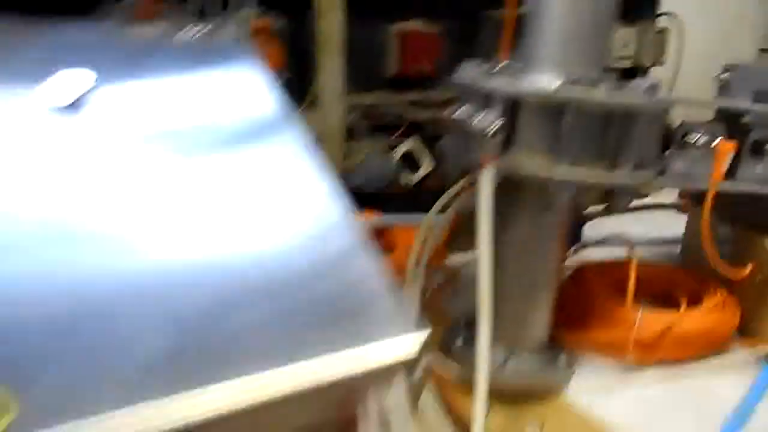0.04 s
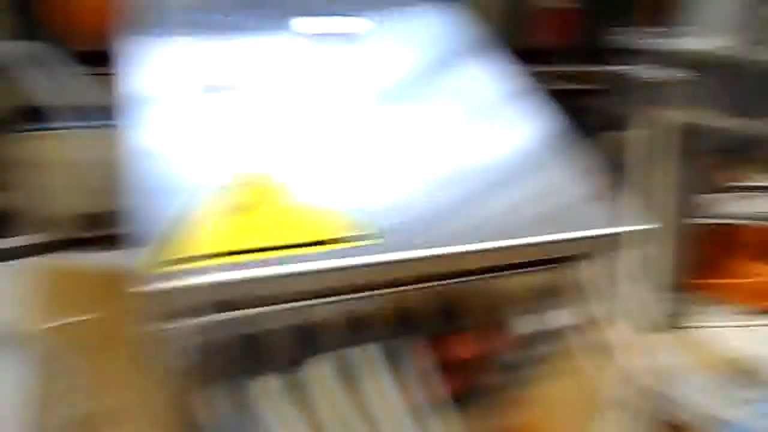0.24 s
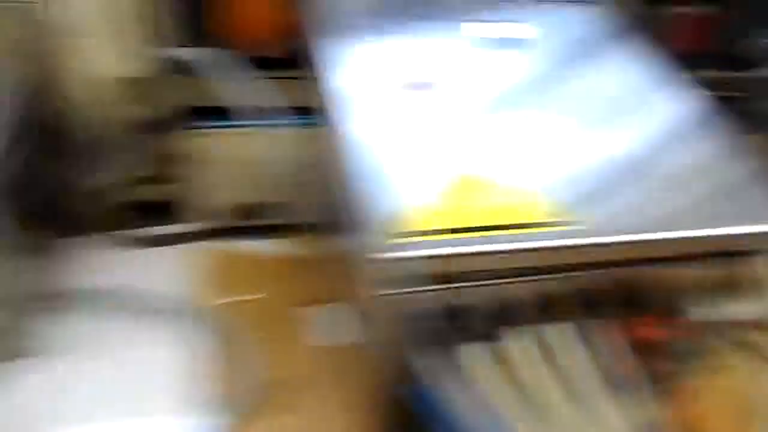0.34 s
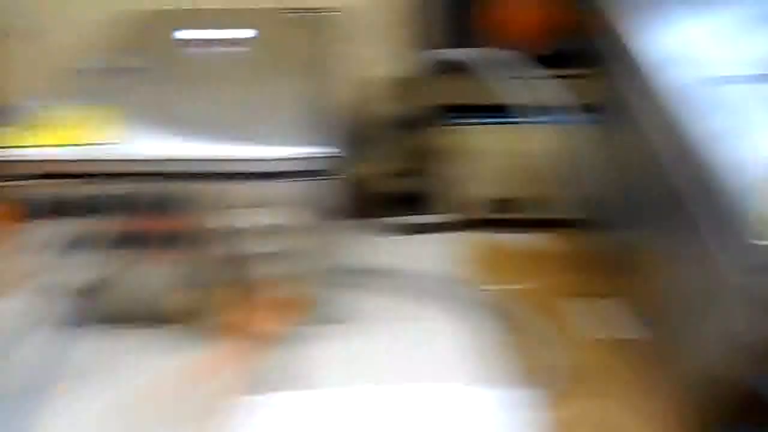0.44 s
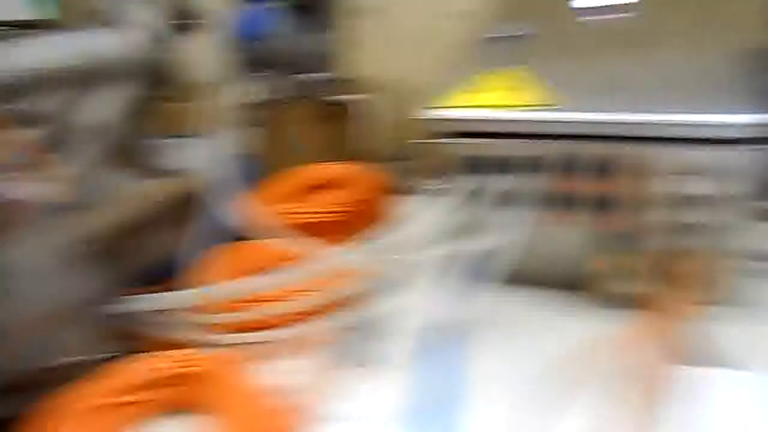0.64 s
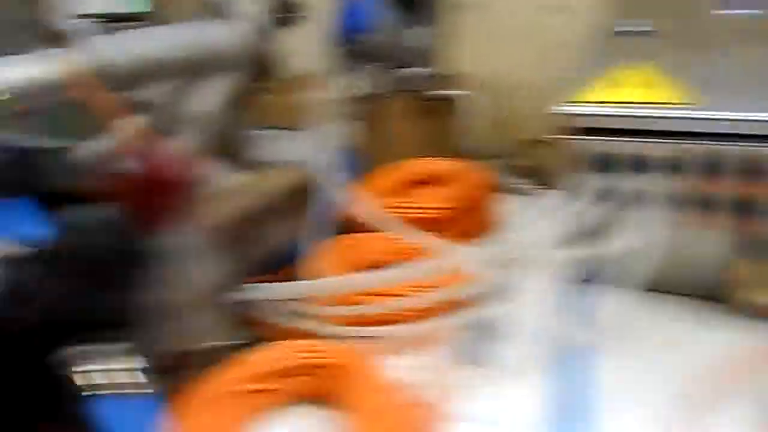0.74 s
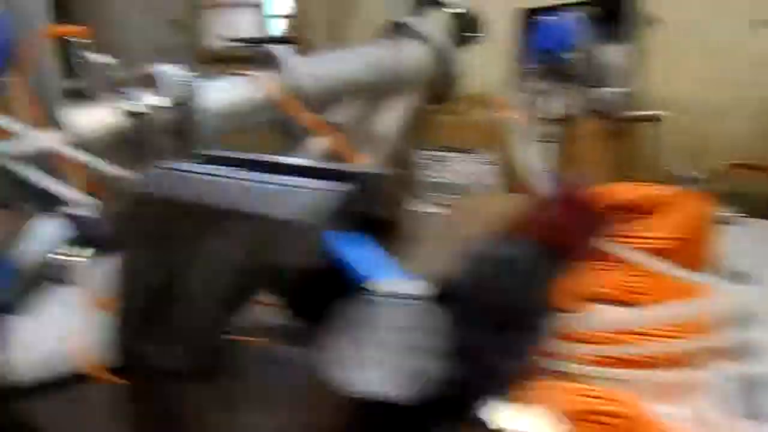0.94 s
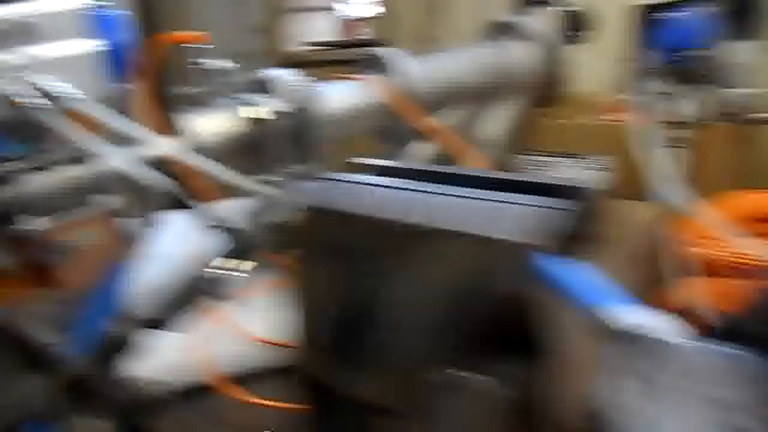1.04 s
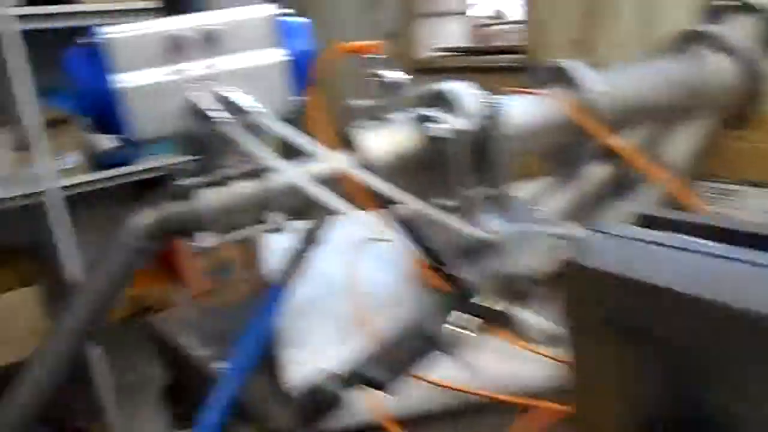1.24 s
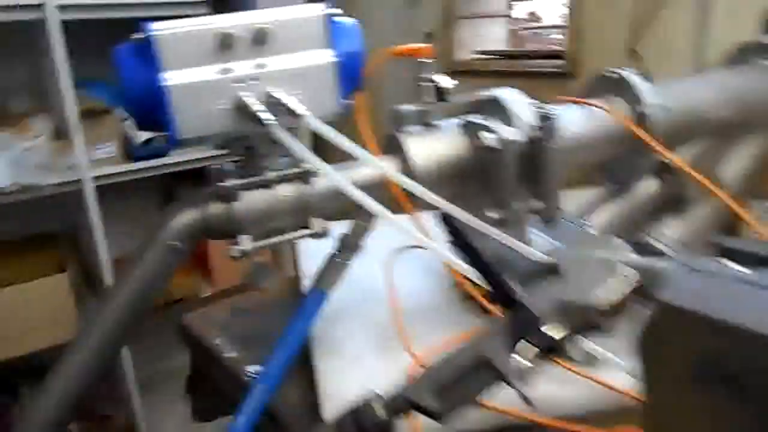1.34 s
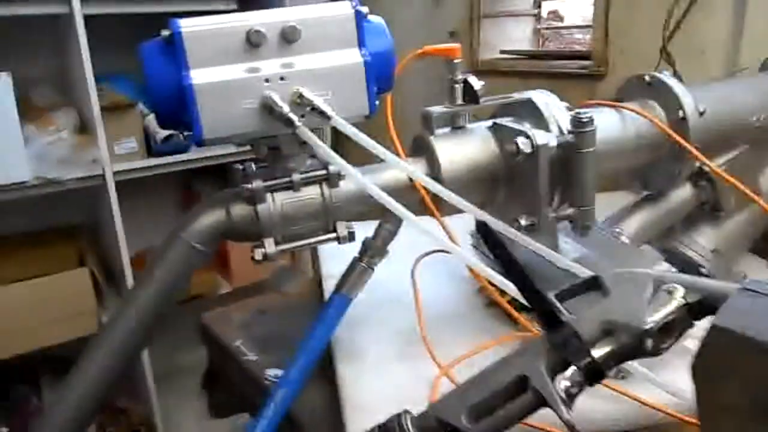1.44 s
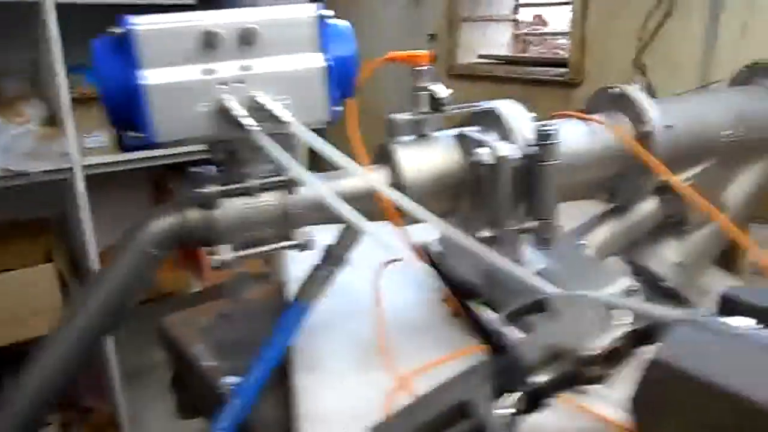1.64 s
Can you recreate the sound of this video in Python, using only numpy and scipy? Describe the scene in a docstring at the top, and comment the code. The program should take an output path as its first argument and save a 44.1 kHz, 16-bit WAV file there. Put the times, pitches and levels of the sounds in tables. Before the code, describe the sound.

Pneumatic valves vent compressed air twice in a lightly echoing workshop. After faint room noise, clicks at 0.2 s lead to a sharp blast at 0.23 s, settling into hiss that closes near 0.51 s with a dull knock. A grainy rustle follows at 0.62-0.76 s. Clicks at 1.1 s start a second blast, with airy whistles, ending with a click near 1.42 s and a short fading tail over a faint leak.

```python
"""Two pneumatic valve vents in a workshop

In a workshop a solenoid ticks, trapped air bursts out as coloured noise with a low thump,
and the cylinder exhausts in a steadier hiss until the stroke ends; then all this happens once more.
Hoses sing as narrow noise, valve bodies ring as decaying sines, and a grainy rustle falls between.
Room noise, a faint leak and handling rumble lie underneath."""
import sys
import numpy as np
from scipy import signal
from scipy.fft import rfft, irfft
from scipy.io import wavfile
from scipy.ndimage import uniform_filter1d

SR = 44100
rng = np.random.default_rng(int(sys.argv[2]) if len(sys.argv) > 2 else 0)


def wav_record(signal):
    """Record a signal, one row per channel, as 16-bit PCM in the file named by sys.argv[1]."""
    frames = np.transpose(np.atleast_2d(signal))
    bounded = np.clip(frames, -1, 1)
    # unit amplitude maps onto the largest positive 16-bit level
    quanta = np.round(bounded * 32767).astype(np.int16)
    wavfile.write(sys.argv[1], SR, quanta)


def ratio_of_db(decibels):
    """Turn decibels (scalar or array-like) into linear amplitude factors; 0 dB maps to 1."""
    return 10 ** (np.asarray(decibels, float) / 20)


N = 74970  # samples, 1.7 s


def curve(rows):
    """Gain over time, drawn straight in dB between (t/s, level/dB) rows."""
    return ratio_of_db(np.interp(np.arange(N) / SR, *np.array(rows).T))


def colour(x, points, peaks=()):
    """Filters by (f/Hz, level/dB) points plus resonant (f/Hz, width/Hz, lift/dB) peaks; rms 1."""
    hz = np.arange(N // 2 + 1) * SR / N + 1  # the 1 keeps the logarithm finite
    f, db = np.array(points).T
    gain_db = np.interp(np.log(hz), np.log(f), db)
    for f0, width, lift_db in peaks:
        gain_db = gain_db + lift_db / (1 + (2 * (hz - f0) / width) ** 2)
    y = irfft(rfft(x) * ratio_of_db(gain_db), N)
    return y / np.std(y)


def walk(rate):
    """Random drift around 0: normal draws held for 1 / rate s and smoothed twice."""
    k = int(SR / rate)
    held = np.repeat(rng.standard_normal(N // k + 1), k)
    return 0.74 * uniform_filter1d(uniform_filter1d(held, k), k)[:N]


def air(points, peaks=()):
    """Turbulent air: coloured noise whose level flickers slightly."""
    hiss = colour(rng.standard_normal(N), points, peaks)
    flicker_db = 1 * walk(70)
    return hiss * ratio_of_db(flicker_db)


def shape(start, rise, until, t60):
    """Envelope: linear rise, hold, then exponential fall (all in s)."""
    t = np.arange(N) / SR
    attack = np.clip((t - start) / rise, 0, 1)
    return attack * ratio_of_db(-60 * np.clip(t - until, 0, None) / t60)


def band(hz, width):
    """Narrow noise: two slow noises carried by a sine and cosine whose pitch may move; rms 1."""
    slow = signal.lfilter(*signal.butter(2, width / 2, fs=SR), rng.standard_normal((2, N)))
    phase = 2 * np.pi * np.cumsum(hz + np.zeros(N)) / SR
    return (slow[0] * np.cos(phase) + slow[1] * np.sin(phase)) / np.std(slow)


def room_noise():
    """Broadband noise of the workshop, its level rising and falling by a few dB."""
    # room noise level: (t/s, level/dB)
    room_levels = [(0, -47.5), (.06, -50.5), (.18, -55.5), (.6, -53.5), (.8, -50), (1.0, -53), (1.1, -48),
                   (1.6, -52.5), (1.7, -53)]
    # room noise spectrum: (f/Hz, density/dB)
    room_spectrum = [(20, -65), (100, -35.5), (180, -19.5), (283, -10.5), (541, -5), (819, -7.5),
                     (1100, -6.5), (1880, -7), (3500, -11.5), (5500, -16.5), (7640, -19.5), (9400, -28.5),
                     (20000, -27)]
    return curve(room_levels) * air(room_spectrum)


def leak():
    """Faint hiss of air through a small gap: turbulence with little bass."""
    # leak level: (t/s, level/dB)
    leak_levels = [(0, -64), (.06, -56.5), (.17, -68), (.75, -54), (.85, -61), (1.0, -54), (1.09, -50),
                   (1.55, -48), (1.62, -49), (1.7, -51)]
    # leak spectrum: (f/Hz, density/dB)
    leak_spectrum = [(800, -25.5), (2500, -2.5), (3300, -5.5), (4500, -4.5), (5800, -6.5), (6750, -2),
                     (7500, -9), (8500, -16), (9400, -21.5), (20000, -13.5)]
    return curve(leak_levels) * air(leak_spectrum)


def rumble():
    """Low rumble of handling: noise weighted towards the bass."""
    # rumble level: (t/s, level/dB)
    rumble_levels = [(0.0, -73), (0.132, -72), (0.268, -78), (0.538, -75), (0.676, -76), (0.88, -69),
                     (0.998, -78), (1.198, -92), (1.652, -84), (1.7, -84)]
    # rumble spectrum: (f/Hz, density/dB)
    rumble_spectrum = [(10, -18), (30, -4.5), (90, -10.5), (200, -19), (1000, -79)]
    return curve(rumble_levels) * air(rumble_spectrum)


def rustle():
    """Dense uneven grains of something brushed or dragged, with a moving hollow tone."""
    # rustle level: (t/s, level/dB)
    rustle_levels = [(.615, -53), (.635, -40.5), (.65, -41.5), (.668, -39), (.7, -41), (.73, -46),
                     (.76, -53.5), (.8, -62.5)]
    # grain spectrum: (f/Hz, density/dB)
    rustle_spectrum = [(60, -48), (154, -22), (450, -6), (900, -10), (1500, -6), (2500, -12), (6700, -21.5),
                       (9900, -39), (12900, -78)]
    # path of the hollow tone: (t/s, f/Hz)
    hollow_path = [(.63, 480), (.655, 850), (.67, 1000), (.695, 800), (.73, 1200)]
    grains_per_s, unevenness_db = 9000, 1.5
    grains = (rng.random(N) < grains_per_s / SR) * rng.standard_normal(N)
    grains = grains * ratio_of_db(unevenness_db * walk(150))
    hollow_hz = np.interp(np.arange(N) / SR, *np.array(hollow_path).T)
    hollow = ratio_of_db(-9) * band(hollow_hz, 500)  # 9 dB below the grains
    envelope = curve(rustle_levels) * shape(rustle_levels[0][0], 0.013, rustle_levels[-1][0], .2)
    return (colour(grains, rustle_spectrum) + hollow) * envelope


def knocks():
    """Dull knocks as each stroke ends: short thuds of narrow low noise."""
    # knocks: (t/s, level/dB, f/Hz, t60/s)
    knock_rows = [(0.514, -52, 230, .4), (1.445, -61, 250, 0.38)]
    out = 0
    for s, db, hz, t60 in knock_rows:
        out = out + ratio_of_db(db) * shape(s, .01, s + 0.0057, t60) * band(hz, hz / 2)
    return out


def solenoids():
    """Solenoid and spool ticks: each rings the valve body modes nearest its centre as decaying sines."""
    # ticks: (t/s, level/dB, centre of the modes struck f/Hz, spread/octaves)
    tick_rows = [(.1990, -33.5, 600, 0.92), (.2010, -37, 4100, 0.18), (.2075, -38, 4100, .2),
                 (.2040, -37, 1490, .2), (0.2117, -27, 7850, .2), (1.1012, -40.5, 6800, .2),
                 (1.1058, -29.5, 1100, 0.84), (1.1165, -13.5, 2900, .4), (1.418, -24, 3200, 0.43)]
    # valve body modes: (f/Hz, level/dB, t60/s)
    body_modes = [(380, 0, 0.012), (694, -1.5, 0.016), (1000, 3.5, 0.012), (1450, 1, 0.035),
                  (2900, -5.5, 0.012), (3600, -6, 0.011), (4100, -9, 0.023), (5130, -6.5, 0.013),
                  (6800, -10, .012), (7500, -3, 0.019), (8000, 5, 0.015), (9100, -7, .01)]
    rise_s = .0008
    out, t = np.zeros(N), np.arange(N) / SR
    all_phases = rng.random((len(tick_rows), len(body_modes)))  # in cycles
    for (s, db, centre_hz, spread), phases in zip(tick_rows, all_phases):
        since = np.clip(t - s, 0, None)
        attack = np.clip(since / rise_s, 0, 1)
        for (hz, mode_db, t60), phase in zip(body_modes, phases):
            near_db = -6 * (np.log2(hz / centre_hz) / spread) ** 2
            ring = np.sin(2 * np.pi * (hz * since + phase))
            out += attack * ratio_of_db(db + mode_db + near_db - 60 * since / t60) * ring
    return out


def pilot_air():
    """Thin decaying hiss of pilot air, starting just before each vent opens."""
    # pilot puffs: (start t/s, level/dB, t60/s)
    puffs = [(.199, -41.5, 0.36), (1.105, -38, 0.55)]
    # pilot spectrum: (f/Hz, density/dB)
    pilot_spectrum = [(100, -22), (700, -5), (2200, -1.5), (4200, 8.5), (6000, -2), (8000, 0.5), (9400, -8),
                      (20000, -7)]
    # pilot resonances: (f/Hz, width/Hz, lift/dB)
    pilot_peaks = [(1460, 110, 6.5), (4100, 200, 5.5), (7650, 400, 3.5)]
    out = 0
    for s, db, t60 in puffs:
        out = out + ratio_of_db(db) * shape(s, .001, s, t60) * air(pilot_spectrum, pilot_peaks)
    return out


def hose_tones():
    """Airy hose tone near 1.2 kHz for each vent: narrow noise whose pitch wanders."""
    # tones: (centre f/Hz, level rows of (t/s, level/dB before a 1 dB cut))
    tone_rows = [(1190, [(0.36, -37), (0.366, -36), (0.516, -30), (0.558, -38), (0.592, -56), (0.62, -60)]),
                 (1114, [(1.2, -32), (1.316, -46), (1.374, -28), (1.422, -27.5), (1.546, -60),
                 (1.58, -74)])]
    width_hz, wander_hz = 260, 50.26  # wander_hz scales the random drift
    out = 0
    for hz, rows in tone_rows:
        envelope = ratio_of_db(-1) * curve(rows) * shape(rows[0][0], .08, rows[-1][0], .2)
        out = out + envelope * band(hz + wander_hz * walk(25), width_hz)
    return out


def whistles():
    """Airy whistles: narrow noise gliding in a straight line from one pitch to another."""
    # glides: (start t/s, end t/s, from f/Hz, to f/Hz, width/Hz, level/dB)
    glides = [(.36, .53, 7500, 8250, 300, -44), (1.19, 1.33, 2860, 2840, 80, -38),
              (1.33, 1.43, 3900, 3700, 250, -36), (1.148, 1.174, 5600, 3500, 500, -25),
              (1.414, 1.425, 2400, 4000, 500, -30)]
    out, t = 0, np.arange(N) / SR
    for s, end, from_hz, to_hz, width, db in glides:
        glide_hz = np.interp(t, [s, end], [from_hz, to_hz])
        out = out + ratio_of_db(db) * shape(s, .006, end, .03) * band(glide_hz, width)
    return out


def vents():
    """Burst of trapped air, a low thump, then steadier exhaust; at the end the treble dies first."""
    # bursts: (opening t/s, burst level/dB, rise/s, hold/s, t60/s, thump level/dB)
    burst_rows = [(.2316, -9, 0.0085, 0.038, 0.42, -38.5), (1.1158, -13.5, 0.0055, 0.035, 0.38, -34.5)]
    # exhausts: (level at the end/dB, slope over the last second/(dB/s), end t/s,
    # release t60 below the split/s, release t60 above it/s)
    flow_rows = [(-25.5, -15.5, 0.51, 0.37, 0.23), (-23.5, -5.5, 1.413, 0.39, 0.32)]
    # burst spectrum of each vent: (f/Hz, density/dB)
    burst_spectra = [
        [(20, -70), (60, -41.5), (250, -25), (830, -10), (1450, -8), (2100, -8.5), (3600, -7.5), (4200, -10),
         (4900, -3), (6500, -2.5), (7000, -9.5), (8500, -17.5), (9400, -19), (20000, -23.5)],
        [(20, -75), (60, -65), (250, -21), (616, -3.5), (1750, -5.5), (2450, -7.5), (2900, -3), (4400, -11),
         (5400, -5.5), (6460, -5), (7200, -11), (8500, -8), (9400, -12), (20000, -16)],
    ]
    # exhaust spectrum of each vent: (f/Hz, density/dB)
    flow_spectra = [
        [(20, -71), (60, -47), (230, -27), (440, -10.5), (650, -4.5), (1270, -4.5), (2130, -5), (3300, -3.5),
         (4900, -3.5), (6300, -8.5), (7000, -15), (8000, -12.5), (9400, -22.5), (20000, -20)],
        [(20, -92), (124, -57), (350, -25.5), (600, -9), (1120, -1), (2170, -12.5), (2900, -8.5), (4600, -10),
         (6000, -11.5), (7300, -17), (8300, -21), (9400, -23), (20000, -20.5)],
    ]
    # hose and muffler resonances in each burst: (f/Hz, width/Hz, lift/dB)
    burst_peaks = [
        [(1220, 180, 5.5), (1700, 120, 3.5), (3200, 150, 3), (3753, 150, 7), (4820, 53, 2.5), (5500, 90, -0.5),
         (5570, 80, 6), (5800, 120, 3.5), (6230, 89, 1), (6620, 90, 0.5), (7550, 120, 3)],
        [(1260, 120, 5.5), (1820, 100, 6), (2806, 30, 7.5), (3220, 49, -0.5), (3670, 80, 10), (5200, 80, -4),
         (5200, 90, 13.5), (5910, 80, 8), (6450, 150, 10), (8290, 150, 4), (8800, 240, -1)],
    ]
    # hose and muffler resonances in each exhaust: (f/Hz, width/Hz, lift/dB)
    flow_peaks = [
        [(674, 21, 4), (2300, 82, 2.6), (3200, 190, 6.2), (3810, 100, 3.4), (3980, 84, 2.6), (4850, 100, 4.1),
         (5200, 130, 7.4), (5590, 140, 6.8), (6300, 68, 2.9), (7600, 170, 5.9), (8420, 220, 5)],
        [(800, 61, 2.4), (1870, 78, 6.1), (2290, 50, 4.9), (2867, 36, 8.7), (3560, 66, 6.9), (3950, 200, 5),
         (5600, 90, 7.7), (5640, 150, 3), (5970, 88, 4), (6330, 80, 4), (7700, 200, 4.2)],
    ]
    split_hz = 2500
    thump_spectrum = [(20, -25), (180, 0), (600, -6), (2000, -30), (20000, -90)]  # (f/Hz, level/dB)
    out, t = 0, np.arange(N) / SR
    for i, (s, burst_db, rise, hold, t60, thump_db) in enumerate(burst_rows):
        flow_db, slope, end, low_t60, high_t60 = flow_rows[i]
        burst = ratio_of_db(burst_db) * shape(s, rise, s + hold, t60) * air(burst_spectra[i], burst_peaks[i])
        sagging = ratio_of_db(flow_db + slope * np.clip(t - end, -1, 0))
        opening = shape(s, rise, 2, 1)  # held past the end of the scene; the release below closes it
        jet = burst + sagging * opening * air(flow_spectra[i], flow_peaks[i])
        low = uniform_filter1d(jet, int(SR / split_hz / 2))
        high = jet - low
        out = out + low * shape(0, 1e-3, end, low_t60) + high * shape(0, 1e-3, end, high_t60)
        thump = colour(rng.standard_normal(N), thump_spectrum)
        out = out + ratio_of_db(thump_db) * shape(s, 0.0036, s + 0.014, 0.098) * thump
    return out


def room(x):
    """Direct sound plus a dull decaying scatter of reflections, as noise convolved with it."""
    t60_s, tail_db, dull_hz = 0.39, -15.5, 5000
    t = np.arange(SR // 2) / SR
    tail = rng.standard_normal(len(t)) * ratio_of_db(-60 * t / t60_s) * np.clip(t / 0.0027, 0, 1)
    tail = signal.lfilter(*signal.butter(1, dull_hz, fs=SR), tail)
    return x + ratio_of_db(tail_db) * signal.fftconvolve(x, tail / np.linalg.norm(tail))[:N]


def scene():
    """Background noises stay dry; every other source sounds in the room."""
    floor = room_noise() + leak() + rumble()
    events = rustle() + knocks() + solenoids() + pilot_air() + hose_tones() + whistles() + vents()
    return (room(events) + floor)[None]


def top_cut(x):
    """Nothing passes above the cut-off."""
    return signal.sosfilt(signal.butter(12, 10050, fs=SR, output="sos"), x)


def record(dry):
    """Gain control turns loud passages down and rounds peaks; the microphone loses the top."""
    # microphone response: (f/Hz, level/dB)
    mic_response = [(20, -1), (9000, 1), (9500, -7.5), (9800, -17.5), (10050, -27), (20000, -80)]
    threshold_db, ratio, window_s = -32, 1.327, 0.12
    ceiling, top_hz = .9, 10050
    k = np.exp(-1 / (window_s * SR))
    power = signal.lfilter([1 - k], [1, -k], dry ** 2)
    over = power / ratio_of_db(2 * threshold_db)
    held = dry[0] * (1 + over[0]) ** (-(1 - 1 / max(ratio, 1)) / 2)
    held = ceiling * np.tanh(held / ceiling)
    dull = np.std(held) * colour(held, mic_response)[None]  # same rms as before the microphone
    steep = signal.ellip(10, .2, 80, top_hz, fs=SR, output="sos")
    return top_cut(signal.sosfilt(steep, dull))


dry = scene()
out = record(dry)
wav_record(out)
```